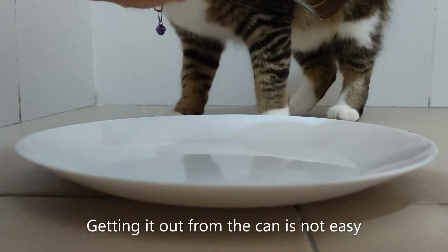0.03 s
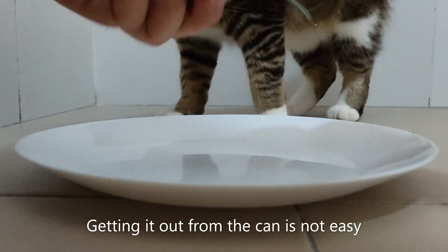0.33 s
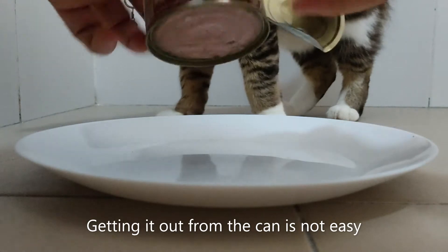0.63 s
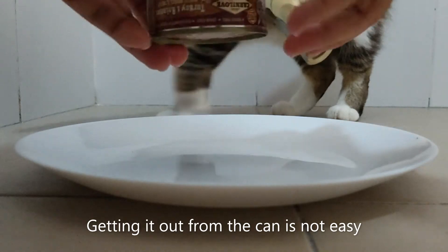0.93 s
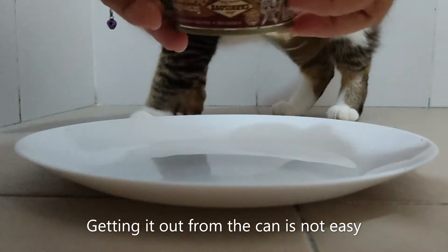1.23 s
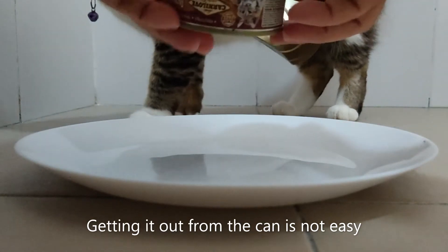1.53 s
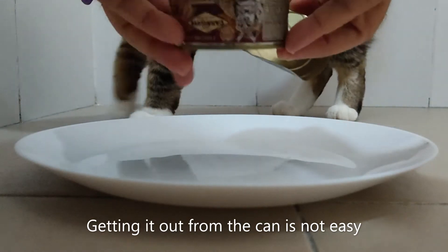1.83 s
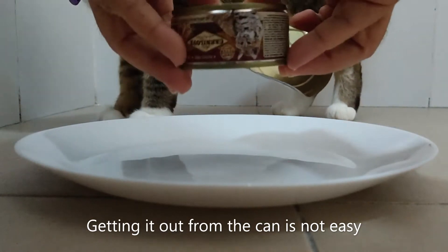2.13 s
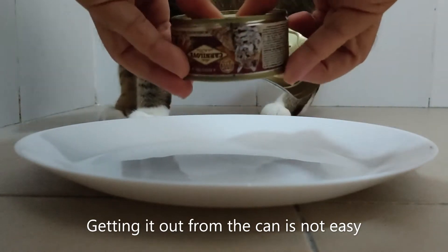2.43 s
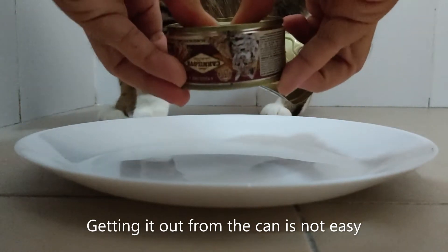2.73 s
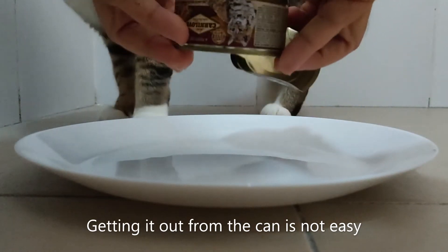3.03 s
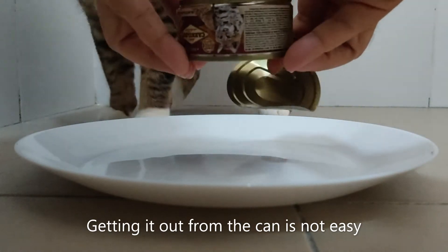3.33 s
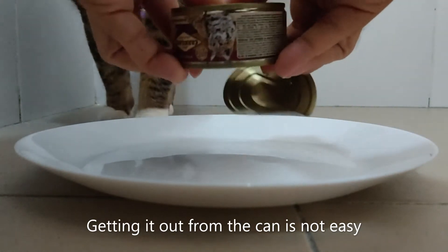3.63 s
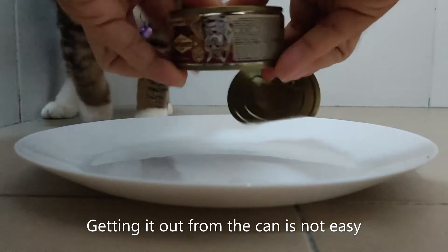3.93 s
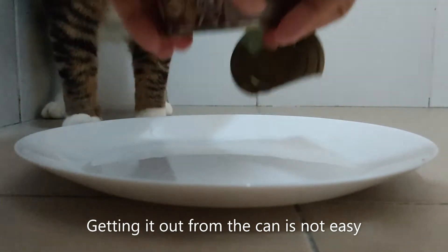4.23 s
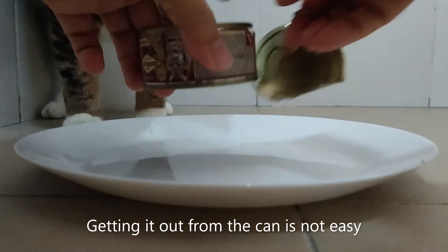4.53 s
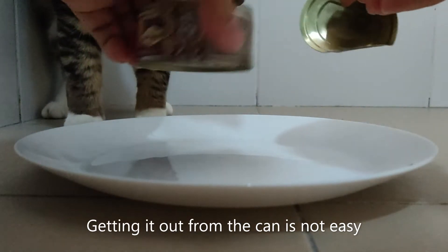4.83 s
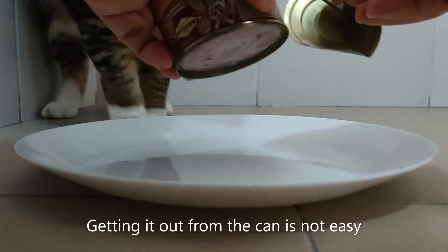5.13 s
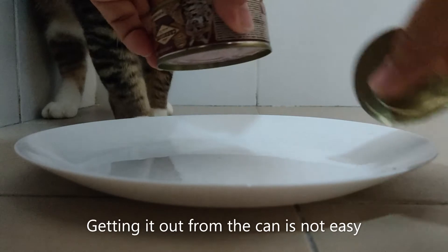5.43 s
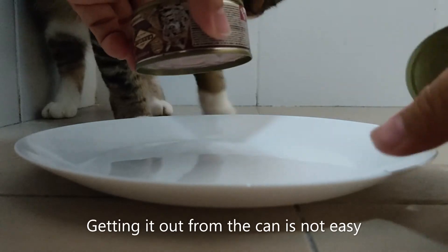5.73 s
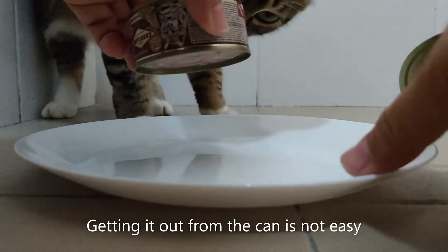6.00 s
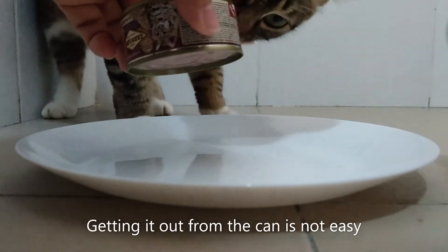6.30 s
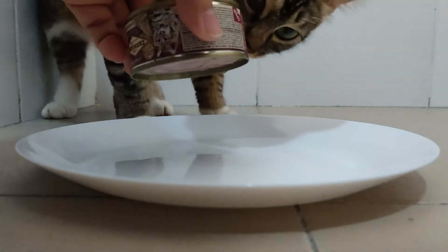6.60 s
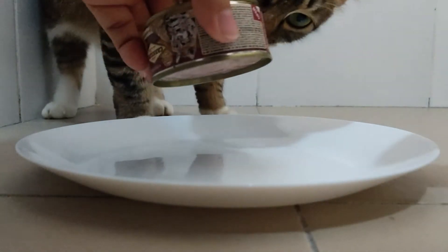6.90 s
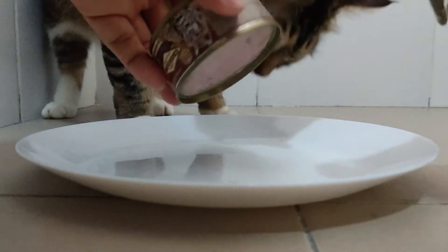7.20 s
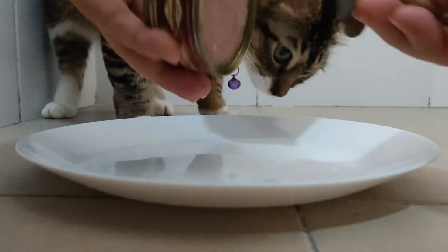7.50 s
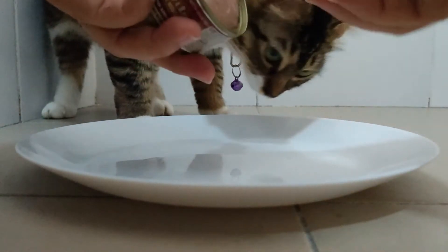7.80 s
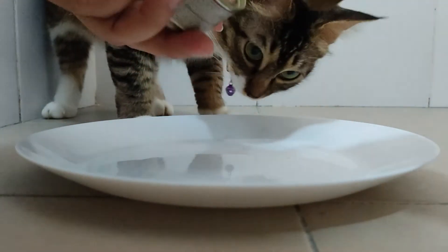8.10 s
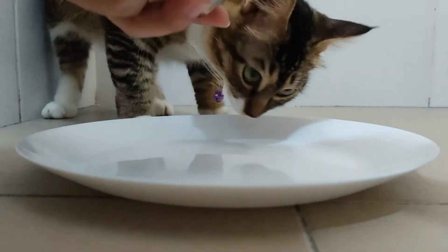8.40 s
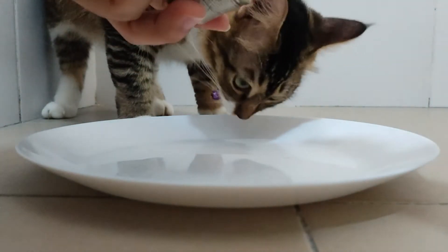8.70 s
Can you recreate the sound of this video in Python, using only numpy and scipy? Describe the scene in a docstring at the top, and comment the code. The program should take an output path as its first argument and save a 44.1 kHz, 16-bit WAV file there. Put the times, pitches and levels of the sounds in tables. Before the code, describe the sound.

A small tiled room rumbles low under a distant motor hum, and a bird outside chirps and whistles faintly throughout. A cat purrs softly nearby for the first four seconds. Close up, fingers rustle and tap on a tin of cat food, with a hollow tap at 0.6 seconds. The loose lid clinks brightly on the tin at 1.3 seconds, then scrapes in short strokes until about 2.9. The thin wall buckles with a click at 3 seconds. Light taps follow, and the lid rings at 4.5. Around 5.6 seconds it bounces and skids on a china plate in a quick clatter, steel and china ringing briefly. Soft bumps of hands on the tin continue, with sharper metallic taps between 7.5 and 8 seconds. The contacts carry a short echo, and the whole sound dips for an instant near 8.4 seconds.

```python
"""A room rumbles low under a far motor's hum; a cat purrs close by and a bird calls outside.
Fingers rub, tap and bump a tin of cat food over a china plate, and its thin wall buckles with a click.
The loose lid clinks and scrapes on the tin, then bounces and skids on the plate; steel and china ring.
The small room's tiled walls add an echo. Near the end the level dips briefly."""
import sys
import numpy as np
from scipy import signal
from scipy.fft import rfft, irfft, next_fast_len
from scipy.io import wavfile
from scipy.ndimage import map_coordinates

SR = 44100
rng = np.random.default_rng(int(sys.argv[2]) if len(sys.argv) > 2 else 0)


def unload_audio(sound):
    """Save the sound as a 16-bit wav file, at the path given as the first command line argument."""
    columns = np.transpose(np.atleast_2d(sound))
    # keep every value between -1 and 1, then stretch to whole-number steps
    steps = np.round(np.clip(columns, -1, 1) * 32767)
    wavfile.write(sys.argv[1], SR, steps.astype(np.int16))


N = 385875


def amp(db):
    """Decibels to gain."""
    return 10 ** (np.asarray(db) / 20)


def unit(x):
    """Scale to rms 1."""
    return x / np.sqrt(np.mean(x ** 2) + 1e-20)


def along(points, hz):
    """Interpolate (Hz, value) points on a log axis."""
    f, v = np.transpose(points)
    return np.interp(np.log(hz + 1), np.log(f + 1), v)


def curves(rows):
    """One value per sample for each column after the time."""
    s, *cols = np.transpose(rows)
    return [np.interp(np.arange(N) / SR, s, c) for c in cols]


def wobble(knots_per_s, size=N):
    """A smooth random curve."""
    knots = rng.standard_normal(int(size * knots_per_s / SR) + 4)
    return map_coordinates(knots, [np.arange(size) * knots_per_s / SR])


def bouts(rows, attack_s, release_s):
    """Gain of (start s, length s, dB) gestures: each rises, holds and dies away."""
    t = np.arange(N) / SR
    gain = np.zeros(N)
    for s, length_s, db in rows:
        rise = np.clip((t - s) / attack_s, 0, 1)
        gain += amp(db) * rise * np.exp(-np.maximum(t - s - length_s, 0) / release_s)
    return gain


def swell(size):
    """A rounded rise and fall."""
    return np.sqrt(np.abs(np.sin(np.linspace(0, np.pi, size))))


def fade(t60_s, attack_s):
    """One second of a quick rise and an exponential decay."""
    t = np.arange(SR) / SR
    return np.exp(-np.log(1000) * t / t60_s) * (1 - np.exp(-t / attack_s))


def add(track, s, sound):
    """Mix a sound in at time s."""
    part = track[:, max(round(s * SR), 0):][:, :sound.shape[-1]]
    part += sound[..., :part.shape[1]]


def noise(spectrum, coherence, lag_ms=0, size=N, body=()):
    """Coloured stereo noise of rms 1 through a body's resonances; the left side lags."""
    m = next_fast_len(size)
    hz = np.fft.rfftfreq(m, 1 / SR)
    peaks = sum(amp(db) ** 2 / (1 + (2 * (hz - centre) / width) ** 2) ** 2 for centre, width, db in body)
    a, b = rfft(rng.standard_normal((2, m))) * amp(along(spectrum, hz)) * np.sqrt(1 + peaks)
    turn = np.arccos(coherence) / 2
    mid, side = a * np.cos(turn), b * np.sin(turn)
    delay = np.exp(-2j * np.pi * hz * lag_ms / 1000)
    return unit(irfft([(mid + side) * delay, mid - side], m)[:, :size])


def ring(modes, tilt_db=0, scatter_db=1, split_hz=11, twin=.2):
    """Struck modes of a round body, each beating with a close twin; sides about a quarter cycle apart."""
    out = np.zeros((2, SR))
    gains = amp([db + tilt_db * np.log2(hz) for hz, db, _ in modes])
    gains /= np.sqrt(np.sum(gains ** 2) * (1 + twin ** 2) / 2)
    for (hz, _, t60_s), gain in zip(modes, gains):
        t = np.arange(int(np.clip(t60_s, .02, 1) * SR)) / SR
        cycles = hz * t + rng.random() + np.array([[0], [rng.normal(1 / 4, .07)]])
        beat = rng.normal(0, split_hz) * t + rng.choice([-1, 1]) / 4
        pair = np.sin(2 * np.pi * cycles) + twin * np.sin(2 * np.pi * (cycles + beat))
        add(out, 0, gain * amp(scatter_db * rng.standard_normal()) * fade(t60_s, .0008)[:len(t)] * pair)
    return out


# Tiled room's decay. Each row: frequency in Hz, t60 in seconds.
ROOM_T60 = [(200, 0.81), (1000, 0.69), (4000, 0.6), (8000, 0.55), (14000, 0.36)]
def room(x):
    """Echo of the tiled walls, each frequency dying at its own speed."""
    hz, t, bins = signal.stft(rng.standard_normal((2, SR * 2 // 3)), SR, nperseg=256)
    tail = signal.istft(bins * amp(-60 * t / along(ROOM_T60, hz)[:, None]), SR, nperseg=256)[1]
    tail = np.pad(tail / np.linalg.norm(tail[0]), ((0, 0), (SR // 300, 0)))
    return signal.fftconvolve(x, tail, axes=1)[:, :x.shape[1]]


# Rumble's course. Each row: time in seconds, level in dB.
RUMBLE_LEVELS = [(0, -54), (.37, -50), (.75, -56), (1.6, -55), (2.1, -50), (2.45, -58), (2.76, -49.5),
                 (3.05, -53.5), (3.9, -51.5), (4.45, -52), (7, -51.5), (7.6, -54), (8.1, -52), (8.75, -55)]
# Rumble and still air. Each row, as in every SPECTRUM: frequency in Hz, relative density in dB.
RUMBLE_SPECTRUM = [(25, -7.5), (50, -19.5), (110, -20.5), (135, -7), (157, 1), (170, -3.5), (188, 3),
                   (218, -2), (250, -13.5), (330, -19.5), (600, -28), (1200, -63.5), (3000, -120)]
AIR_SPECTRUM = [(25, -16), (60, -6.5), (110, -12), (195, -2), (290, -26.5), (400, -7.5), (660, -20),
                (1100, -28.5), (2000, -36.5), (4500, -47), (8500, -47), (10500, -54), (12800, -52),
                (14500, -84)]
def room_tone(sway_db=.82):
    """Low rumble booms in the room and sways a little over still air."""
    rumble_db, = curves(RUMBLE_LEVELS)
    rumble = amp(rumble_db + sway_db * wobble(5)) * noise(RUMBLE_SPECTRUM, 1, lag_ms=.15)
    return rumble + amp(-58.5) * noise(AIR_SPECTRUM, .15, lag_ms=.3)


# Motor's course. Each row: time in seconds, pitch in Hz, relative level in dB.
MOTOR_COURSE = [(0, 86.6, -63.5), (1.9, 88.93, -69), (2.4, 63.75, -69), (3.2, 66.1, -54.5),
                (4.5, 68.5, -65), (5.4, 83, -59.5), (6.1, 87.9, -53), (8, 87.46, -49.5),
                (8.75, 85.1, -51.5)]
MOTOR_SPECTRUM = [(15, -15.5), (28, 0), (48, 3.5), (75, -8), (130, -42.5), (400, -120)]
def motor():
    """A far motor hums at a drifting pitch over its own rumble."""
    hz, db = curves(MOTOR_COURSE)
    hum = amp(1.9 * wobble(5.5)) * unit(np.sin(2 * np.pi * np.cumsum(hz) / SR))
    return amp(db - 8) * (hum + amp(-10) * noise(MOTOR_SPECTRUM, .28))


# One bout per breath. Each row: start in seconds, length in seconds, level in dB.
PURR_BOUTS = [(.03, 0.38, -60), (.56, 0.13, -48.5), (1.13, 0.24, -53), (1.52, 0.18, -55.5),
              (1.95, 0.5, -57), (2.25, 0.6, -58.5), (3.07, 0.29, -56.5), (3.62, 0.11, -49)]
THROAT_SPECTRUM = [(60, -19.5), (120, -23.5), (190, 7.5), (280, -18), (400, -4.5), (520, 5.5), (620, -16.5),
                   (800, -23.5), (1700, -22.5), (3000, -35.5), (6000, -100)]
def purr(rate_hz=25.4, decay_cycles=.18, rest_db=-66):
    """The larynx lets out puffs that die away in the throat, going on faintly between bouts."""
    effort = np.hypot(amp(rest_db), bouts(PURR_BOUTS, attack_s=.15, release_s=.0089))
    cycle = np.cumsum(rate_hz * (1 + .02 * wobble(4))) / SR % 1
    puffs = unit(np.exp(-cycle / decay_cycles) * (1 - np.exp(-cycle / .047)))
    voice = effort * puffs * noise(THROAT_SPECTRUM, .72, lag_ms=.56)
    return voice + amp(-7.5) * room(voice)


# Each row: start in seconds, length in seconds, relative level in dB, pitch in Hz.
BIRD_PIPS = [(0.218, .01, -61, 4220), (0.248, 0.019, -40, 4140), (3.2, 0.08, -63.5, 2820),
             (7.95, 0.13, -62.5, 2870)]
# Each row: start in seconds, length in seconds, relative level in dB.
BIRD_CHIRPS = [(0.289, 0.14, -63), (0.83, 0.047, -55), (3.453, 0.1, -59), (3.84, 0.061, -61),
               (4.157, 0.041, -58), (4.847, 0.12, -56.5), (6.214, 0.079, -53), (6.544, 0.059, -59.5),
               (6.815, 0.035, -60.5), (7.051, 0.085, -60), (7.155, 0.081, -61.5), (7.781, 0.13, -57),
               (8.173, 0.052, -57), (8.511, 0.027, -63)]
RASP_SPECTRUM = [(2500, -9.5), (3700, -10.5), (4400, 1.5), (5200, -13), (6100, 0), (6800, -8.5),
                 (8000, -1.5), (10000, -31.5), (13000, -66.5)]
# Each row: start, length and accent delay in seconds, relative level in dB, first and last pitch in Hz.
BIRD_WHISTLES = [(1.117, 0.15, 0.065, -46, 3650, 3550), (3.255, 0.29, 0.037, -48, 3640, 3540),
                 (5.9, 0.26, 0.041, -47.5, 3554, 3510), (8.012, 0.335, 0.047, -49.5, 3640, 3586)]
def bird(pip_drop=.015, rasp_hz=52, rise_db=4.5, fall_db=16):
    """Falling pips, pulsed raspy chirps and wavering whistles with an octave overtone."""
    pips, calls = np.zeros((2, 2, N))
    for s, length_s, db, hz in BIRD_PIPS:
        t = np.arange(int(length_s * SR)) / SR
        cycles = hz * t * (1 + pip_drop * (1 - t / length_s) / 2)
        add(pips, s, amp(db) * swell(len(t)) * np.sin(2 * np.pi * cycles))
    for s, length_s, db in BIRD_CHIRPS:
        t = np.arange(int(length_s * SR)) / SR
        pulses = unit(np.sin(np.pi * rasp_hz * t) ** 4)
        add(calls, s, amp(db) * swell(len(t)) * pulses * noise(RASP_SPECTRUM, .13, size=len(t)))
    for s, length_s, accent_s, db, start_hz, end_hz in BIRD_WHISTLES:
        size = int(length_s * SR)
        accent_db = np.interp(np.arange(size) / SR, [0, accent_s, length_s], [-rise_db, 0, -fall_db])
        hz = np.linspace(start_hz, end_hz, size) * (1 + .016 * wobble(420, size))
        phase = 2 * np.pi * np.cumsum(hz) / SR
        tone = np.sin(phase) + amp(-6) * np.sin(2 * phase)
        flutter = unit(amp(3.5 * wobble(220, size)))
        add(calls, s, amp(db + accent_db) * swell(size) * flutter * tone)
    return amp(-7.5) * (calls + pips) + amp(-8) * room(calls + amp(-7.5) * pips)


# Shifts of grip. Each row: start in seconds, length in seconds, level in dB.
FINGER_RUBS = [(.22, 0.12, -72.5), (.84, 0.087, -58.5), (1.0, 0.9, -68), (2.14, 1.31, -67),
               (4.35, 0.11, -61.5), (5.85, 0.29, -65.5), (6.85, 0.61, -79.5), (7.45, 0.019, -56.5),
               (7.96, 0.054, -57)]
SKIN_SPECTRUM = [(700, 1), (1800, -3), (4000, -5.5), (5500, -5.5), (7900, 4), (9400, -5.5), (10500, -26),
                 (14500, -26), (16000, -48)]
def rubs(hold_db=-77.5):
    """Fingers rustle on the tin, faintly even when they only hold it."""
    grip = np.hypot(amp(hold_db), bouts(FINGER_RUBS, attack_s=.038, release_s=.05))
    grains = amp(.5 * wobble(20)) * unit(amp(1.4 * wobble(180)))
    rustle = grip * grains * noise(SKIN_SPECTRUM, .16, lag_ms=.3)
    return rustle + amp(-6) * room(rustle)


# Open tin's wall resonances. Each row: centre in Hz, width in Hz, height in dB.
TIN_WALLS = [(1620, 170, 12), (1790, 120, 9), (2070, 70, 7), (2480, 130, 10), (2660, 110, 8),
             (3050, 60, 10), (3340, 120, 13.5), (3530, 60, 11), (3800, 60, 7), (4400, 80, 19),
             (4600, 90, 13), (5040, 110, 15), (5600, 55, 18), (5720, 70, 10), (6050, 250, 9),
             (6300, 60, 10), (6730, 90, 18), (6890, 65, 19), (7340, 70, 14), (7540, 80, 13),
             (7850, 200, 17), (8100, 120, 12), (8330, 70, 15), (8850, 120, 20), (9250, 85, 19),
             (9560, 120, 13), (9900, 150, 11), (10600, 80, 14), (11970, 280, 13), (14600, 250, 10)]
def gripped_walls(scatter_db=4):
    """Each new grip damps the wall resonances differently."""
    return [(hz, width, db + scatter_db * rng.standard_normal()) for hz, width, db in TIN_WALLS]


def tilted(spectrum, db_per_octave):
    """Tilt a spectrum up to the steel's main resonances."""
    return [(hz, db + db_per_octave * np.log2(min(hz, 8000))) for hz, db in spectrum]


# Fingers and lid on the tin. Each row: start in seconds, level in dB, knock in dB relative to it,
# hollow ring in dB relative to the knock, tilt in dB per octave.
TIN_TAPS = [(.25, -49, -14.5, -23, -3), (.334, -50.5, -5, -23, 0), (.568, -29, -11.5, -7.5, -5),
            (.879, -33, -27, -8.5, 8.5), (1.049, -40.5, -29, -9, 2.5), (1.084, -39, -24, -23, -1),
            (1.48, -26.5, -16.5, -20, 2), (1.658, -35, -34, -17, 1.5), (2.514, -35.5, -18, -29, -5.5),
            (2.613, -48.5, -33, -20, -1), (2.648, -41, -27, -22, 3), (2.707, -35, -32.5, -31, 0),
            (2.755, -44, -10, -22, -8), (3.095, -42, -7.5, -17.5, 6), (3.699, -45, -12, -16, -5),
            (4.014, -41, 2, -32, 6.5), (4.343, -35, -9, -16.5, 1), (5.047, -43.5, -20.5, -5.5, 3),
            (6.418, -57.5, 1, -24.5, 0.5), (6.693, -48, -2.5, -35, 3), (7.332, -58, -1, -24, 12),
            (7.465, -36.5, -35, -26, 1.5), (7.679, -35, -36, -16.5, 3.5), (7.986, -26, -37, -18, 4),
            (7.998, -30.5, -34, -23, -4)]
# Full tin's modes. Each row, as in all MODES: frequency in Hz, relative level in dB, t60 in seconds.
HOLLOW_MODES = [(865, 0, .62), (1205, -15, .3), (1520, -15, .25), (1808, -10, .32), (2140, -13, .2)]
# Thin steel struck, steel scraped, the full tin's body knocked.
CLASH_SPECTRUM = [(900, -39.5), (2000, -12.5), (3300, -14.5), (3950, -17), (4450, -11.5), (5200, -12),
                  (6400, -15), (7000, -3.5), (7900, -1.5), (9300, -13), (10300, -18.5), (11500, -22),
                  (15000, -28), (16500, -45.5)]
SCRAPE_SPECTRUM = [(700, -2.5), (1200, 0.5), (2000, 1), (3300, -3.5), (4300, -2.5), (5400, -7.5),
                   (6800, -2.5), (8100, 1), (9300, -7), (10500, -13.5), (15500, -20)]
KNOCK_SPECTRUM = [(100, -17.5), (350, 0.5), (650, -7), (860, 7), (1150, -2), (1700, -2), (2200, -11.5),
                  (3300, -18.5), (5000, -26.5), (10000, -36.5)]
def taps():
    """Light contacts, damped by the fingers: a tinny tick, ringing walls, a knock and a hollow ring."""
    out = np.zeros((2, N))
    # Narrow resonances ring longest.
    wall_modes = [(hz, db + along(SCRAPE_SPECTRUM, hz), 4 / width) for hz, width, db in TIN_WALLS]
    for s, db, knock_db, hollow_db, tilt_db in TIN_TAPS:
        clash = noise(tilted(CLASH_SPECTRUM, tilt_db), .088, lag_ms=.27, size=SR, body=gripped_walls())
        bite = noise(tilted(SCRAPE_SPECTRUM, tilt_db), .5, lag_ms=.3, size=SR, body=gripped_walls())
        tick = amp(-13) * clash * fade(.055, .002) + amp(-9.5) * bite * fade(.022, .0003)
        walls = amp(1.3 * db) * ring(wall_modes, tilt_db)  # heard only on harder taps
        knock = noise(KNOCK_SPECTRUM, .49, lag_ms=.46, size=SR) * fade(.068, .00035)
        tap = tick + walls + amp(knock_db - .5) * knock
        hollow = amp(knock_db + hollow_db) * ring(HOLLOW_MODES)
        add(out, s, amp(db) * (tap + hollow + amp(-4.5) * room(tap)))
    return out


# Each row: start in seconds, level in dB.
DULL_BUMPS = [(.97, -59), (4.278, -54), (4.53, -47.5), (5.039, -45), (5.569, -46.5), (5.675, -45.5),
              (6.409, -52.5), (6.69, -46), (7.33, -47), (7.67, -48), (8.01, -45)]
THUD_SPECTRUM = [(100, -18), (200, 2), (280, -9), (420, -1), (560, -8), (750, -16), (1500, -29),
                 (4000, -73)]
def bumps(t60_s=.32, attack_s=.0068):
    """Hands meet the full tin softly: a low puff with no ring, prolonged by the room."""
    out = np.zeros((2, N))
    for s, db in DULL_BUMPS:
        add(out, s, amp(db) * noise(THUD_SPECTRUM, .79, lag_ms=.54, size=SR) * fade(t60_s, attack_s))
    return out + amp(-10.5) * room(out)


# Each row: start in seconds, clash and knock in relative dB, part struck, its ring in dB,
# plate's ring in dB, factor on the part's t60.
LID_CLINKS = [(1.2843, -24.5, -40, "tin", -34, -65.5, .8), (1.288, -23, -39.5, "tin", -29, -63.5, 0.77),
              (1.395, -34, -43, "tin", -44.5, -79, 0.64), (4.5167, -24, -38, "face", -26, -71, 0.97),
              (5.565, -21, -41.5, "rim", -20, -65, 0.77), (5.594, -36, -55.5, "rim", -36, -72.5, 0.82),
              (5.608, -35.5, -54.5, "rim", -32.5, -72.5, 1), (5.637, -28, -57.5, "rim", -27.5, -63, 0.96),
              (5.651, -33, -46.5, "face", -35, -63, .5), (5.669, -21.5, -31, "rim", -28, -30, .6),
              (5.683, -32.5, -40, "tin", -41, -42, 0.61)]
# The steel parts and the china plate.
TIN_RIM_MODES = [(1520, -15, .2), (1680, -16, .2), (3050, -15, .2), (3340, -16, .15), (3550, -15, .22),
                 (4447, -19, .25), (4780, -18, .2), (5040, -15, .22), (6030, -9, .22), (6740, -10, .28),
                 (6902, 0, .33), (7345, 1, .36), (7448, -8, .25), (7564, -8, .25), (7709, -6, .25),
                 (7848, 0, .35), (7905, -1, .36), (7983, -4, .28), (8155, -2, .3), (8327, -8, .33),
                 (8624, -11, .3), (8850, -9, .25), (9247, 1, .24), (9550, -14, .3)]
LID_FACE_MODES = [(864, -21, .3), (1579, -10, .34), (1760, -18, .38), (3234, -2, .31), (3706, -18, .42),
                  (4010, -23, .5), (4411, -14, .3), (5609, -17, .2), (6048, -10, .3), (6930, -2, .22),
                  (7356, -1, .35), (7883, -5, .38), (8094, -10, .3), (8330, -14, .3), (8729, -13, .3),
                  (9245, -16, .3), (9645, -23, .38), (10720, -27, .28), (12470, -29, .25)]
LID_RIM_MODES = [(1232, -18, .25), (1297, -11, .25), (3246, -13, .18), (3569, -19, .28), (3903, -26, .3),
                 (4447, -20, .22), (5728, -8, .13), (5890, -9, .13), (6200, -9, .13), (6760, -7, .2),
                 (7004, -4, .18), (7690, -1, .16), (7737, 0, .16), (7812, 0, .15), (7980, 2, .22),
                 (8125, -4, .2), (8630, -3, .2), (8685, -3, .14), (8829, -1, .13), (9119, 5, .14),
                 (9302, -4, .16), (9970, -15, .18), (14580, -20, .15)]
PLATE_MODES = [(837, -4, .75), (1273, -5, .62), (1757, -1, .72), (2293, -9, .8), (2896, 1.5, .5),
               (3052, 0, .33), (3569, -14, .35), (4408, -3, .52), (5132, -2, .35), (5604, -10, .35),
               (5988, -6, .45), (6686, -2, .33), (6928, 0, .38), (7001, 0, .3), (7693, -1, .33),
               (7792, -1, .42), (8568, 0, .25), (8656, -1, .31), (9249, -4, .35), (10260, -16, .3),
               (10480, -12, .22), (11600, -20, .25)]
def clinks():
    """Hard contacts clash and knock, then steel and plate ring on; pressing cuts the steel's ring short."""
    out = np.zeros((2, N))
    parts = {"tin": TIN_RIM_MODES, "face": LID_FACE_MODES, "rim": LID_RIM_MODES}
    for s, clash_db, knock_db, part, ring_db, plate_db, life in LID_CLINKS:
        clash = noise(CLASH_SPECTRUM, .18, lag_ms=.3, size=SR, body=TIN_WALLS) * fade(.046, .0007)
        knock = noise(KNOCK_SPECTRUM, .52, lag_ms=.44, size=SR) * fade(.044, .0012)
        blow = amp(clash_db + 1) * clash + amp(knock_db + 1) * knock
        steel = ring([(hz, db, t60_s * life) for hz, db, t60_s in parts[part]], twin=.053)
        tones = amp(ring_db) * steel + amp(plate_db) * ring(PLATE_MODES, twin=.25)
        # Steel and china ring nearly dry; clash and knock echo more.
        echo = room(amp(-3.5) * blow + amp(-12) * tones)
        add(out, s, blow + tones + echo)
    return out


# Each row: start in seconds, length in seconds, level in dB.
LID_STROKES = [(1.469, 0.05, -43), (1.565, 0.055, -53.5), (1.65, 0.027, -52), (1.728, 0.039, -59.5),
               (2.105, 0.021, -58), (2.2, 0.075, -56.5), (2.314, 0.014, -51.5), (2.361, 0.016, -61),
               (2.401, 0.024, -60.5), (2.447, 0.019, -68), (2.64, 0.026, -78), (2.743, 0.028, -74),
               (2.828, 0.025, -57), (2.879, 0.048, -47)]
def scrapes():
    """The lid's edge catches and slips along the tin in uneven grains that ring its walls."""
    out = np.zeros((2, N))
    for s, length_s, db in LID_STROKES:
        size = int(length_s * SR)
        slips = unit(amp(2.2 * wobble(258, size)))
        friction = noise(SCRAPE_SPECTRUM, .5, lag_ms=.292, size=SR, body=gripped_walls())[:, :size]
        add(out, s, amp(db) * swell(size) * slips * friction)
    return out + amp(-6) * room(out)


# Each row: start in seconds, click in dB, ring in dB, pitch factor.
WALL_BUCKLES = [(1.6575, -48.5, -54, 0.95), (2.893, -54, -51, 0.97), (2.9741, -32.5, -41, 1)]
BUCKLE_MODES = [(2590, -3, .18), (2720, -10, .25), (3285, 0, .14), (3747, -3, .26), (4037, -11, .2),
                (4250, -8, .14), (4576, -10, .2), (5448, -10, .2), (5660, -2, .18), (7390, 0, .2),
                (7640, -2, .2), (8780, -2, .24)]
def buckles():
    """The thin wall gives way under the thumbs with a click, ringing higher when pressed harder."""
    out = np.zeros((2, N))
    for s, click_db, ring_db, pitch in WALL_BUCKLES:
        wall = [(hz * pitch, 130, db + 15.5) for hz, db, _ in BUCKLE_MODES]
        crackle = noise(SCRAPE_SPECTRUM, .75, lag_ms=.27, size=SR, body=wall)
        click = amp(click_db) * crackle * fade(.05, .0026)
        tones = amp(ring_db) * ring([(hz * pitch, db, t60_s) for hz, db, t60_s in BUCKLE_MODES])
        add(out, s, click + tones + room(amp(-4) * click + amp(-11.5) * tones))
    return out


# Each row: start in seconds, length in seconds, level in dB.
LID_SKIDS = [(5.585, 0.085, -38), (5.67, 0.014, -37)]
SKID_SPECTRUM = [(800, -24.5), (1300, -14.5), (1800, -27), (2700, -28), (3300, -12), (4050, -29.5),
                 (4500, -12.5), (5200, -6), (5800, 0.5), (6300, -0.5), (6550, -12.5), (7000, -1),
                 (7900, -3), (8400, -7.5), (9100, 4), (9700, -10), (11000, -20.5), (15500, -28)]
def skids():
    """Between bounces the lid's rim chatters over the plate's glaze in bright, uneven grains."""
    chatter = unit(amp(5 * wobble(550)))
    contact = bouts(LID_SKIDS, attack_s=.002, release_s=.008)
    out = contact * chatter * noise(SKID_SPECTRUM, .18, lag_ms=.3)
    return out + amp(-12.5) * room(out)


def scene():
    """The surroundings and the handled tin, in stereo."""
    surroundings = room_tone() + motor() + purr() + bird()
    return surroundings + rubs() + taps() + bumps() + clinks() + scrapes() + buckles() + skids()


# Each row: time in seconds, gain in dB. The end gains hold before and after the dip.
LEVEL_DIP = [(8.375, 6), (8.389, -19), (8.402, -20), (8.414, 7)]
# Port resonances, right near 7 kHz, left near 9 kHz. Each row: frequency in Hz, left minus right in dB.
PORT_BALANCE = [(60, 4.5), (350, 9), (700, 3.5), (1400, 0.5), (2400, 2), (3400, 0), (4600, -1), (6000, -4),
                (7100, -12), (8100, -5), (9200, 6), (12000, 0.5)]
def record(dry, top_hz=15900):
    """Each microphone port colours its side; the level dips once; nothing passes above top_hz."""
    gain_db, = curves(LEVEL_DIP)
    m = next_fast_len(N + SR // 2)
    hz = np.fft.rfftfreq(m, 1 / SR)
    ports = amp(np.outer([1, -1], along(PORT_BALANCE, hz)) / 2)
    ports /= np.sqrt(np.mean(ports ** 2, axis=0))
    return irfft(rfft(dry * amp(gain_db), m) * ports * (hz < top_hz), m)[:, :N]


dry = scene()
out = record(dry)
unload_audio(out)
```